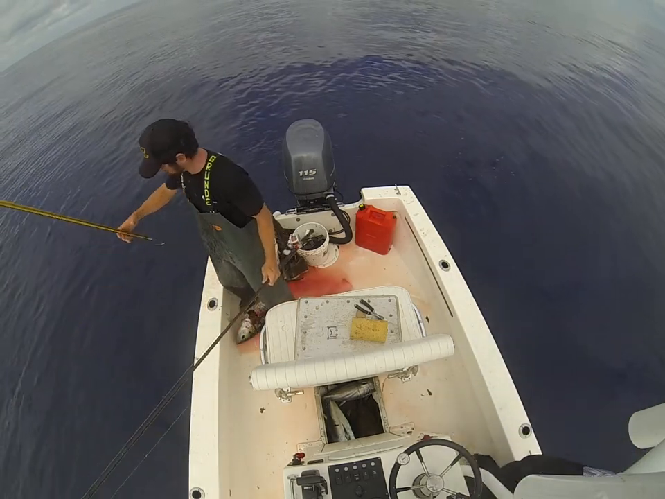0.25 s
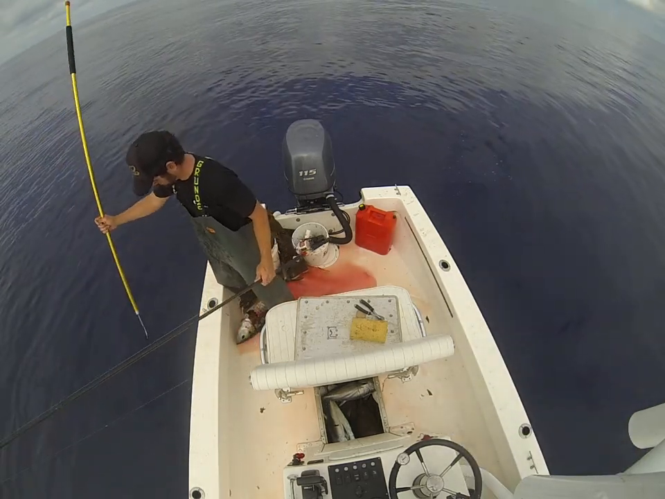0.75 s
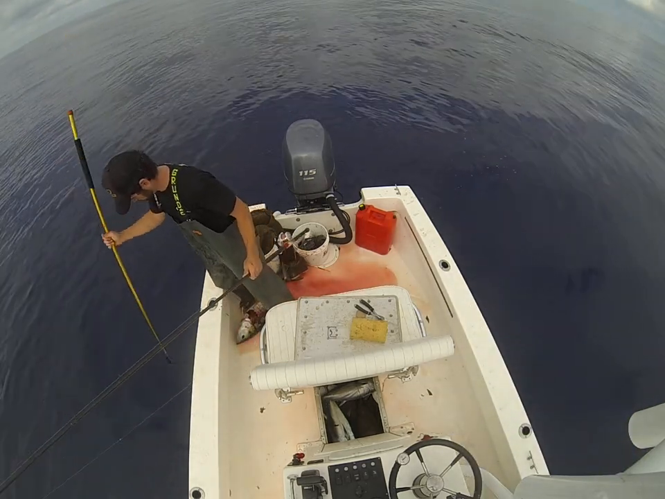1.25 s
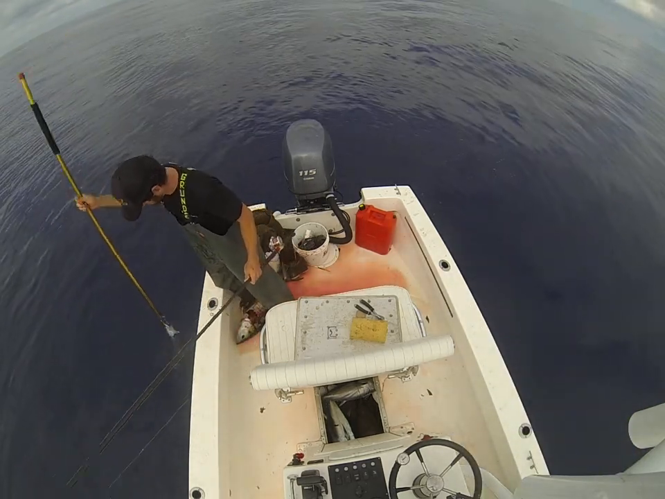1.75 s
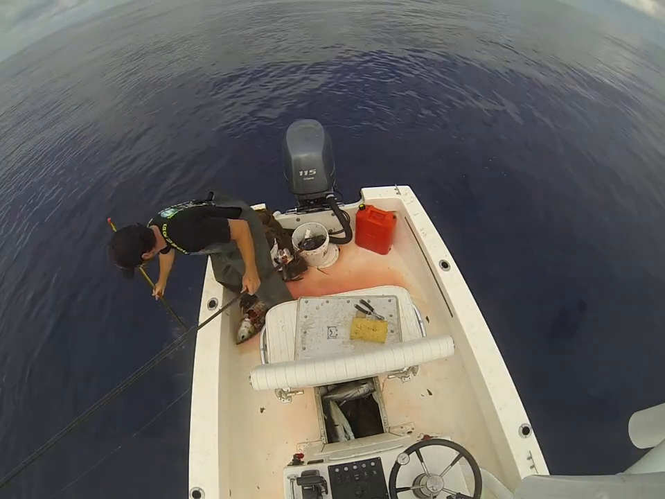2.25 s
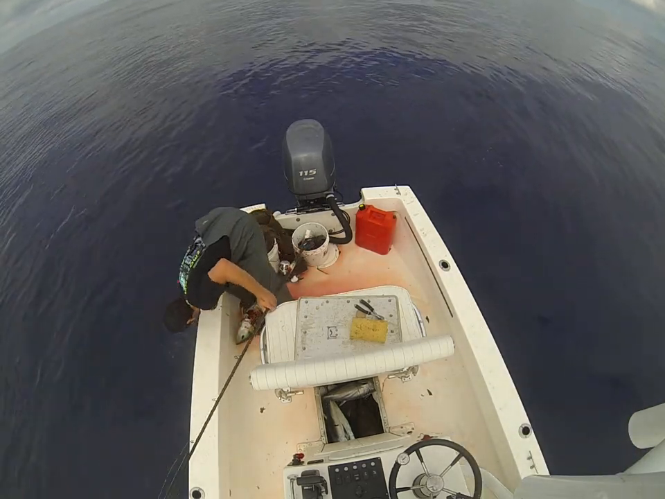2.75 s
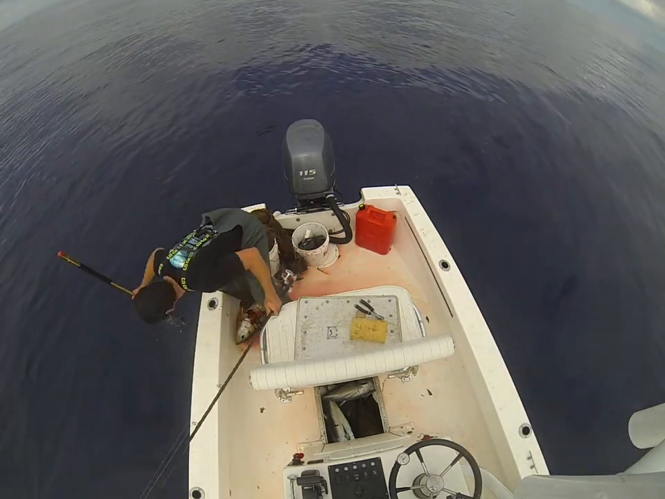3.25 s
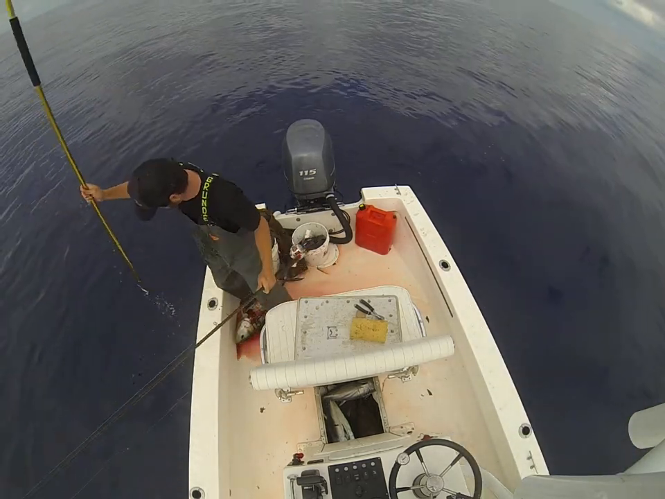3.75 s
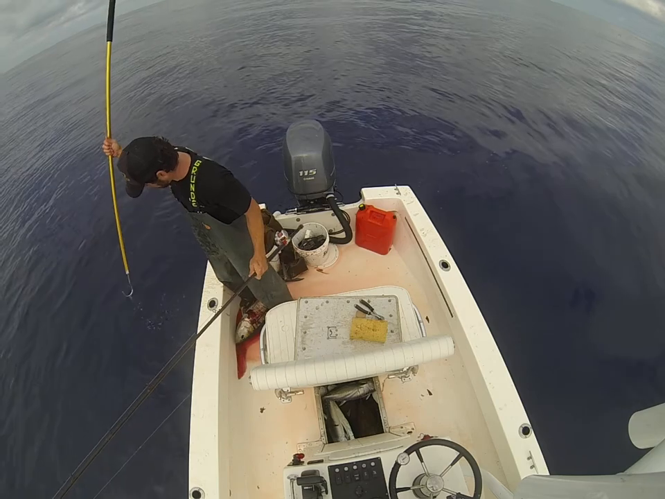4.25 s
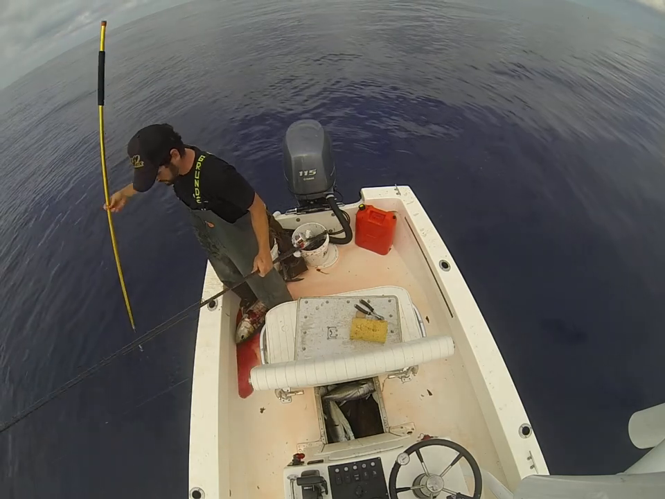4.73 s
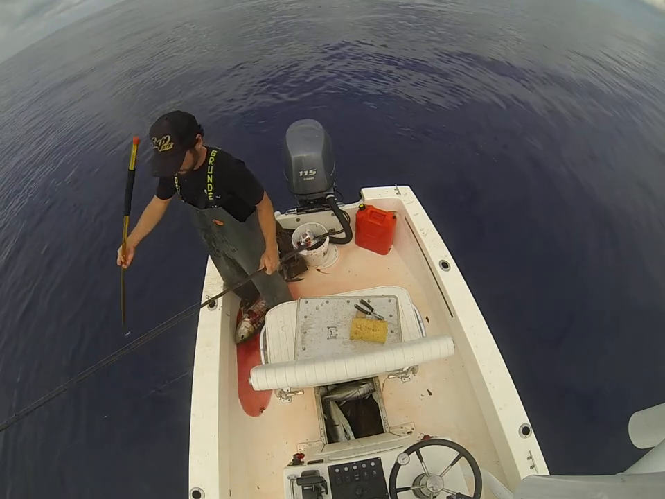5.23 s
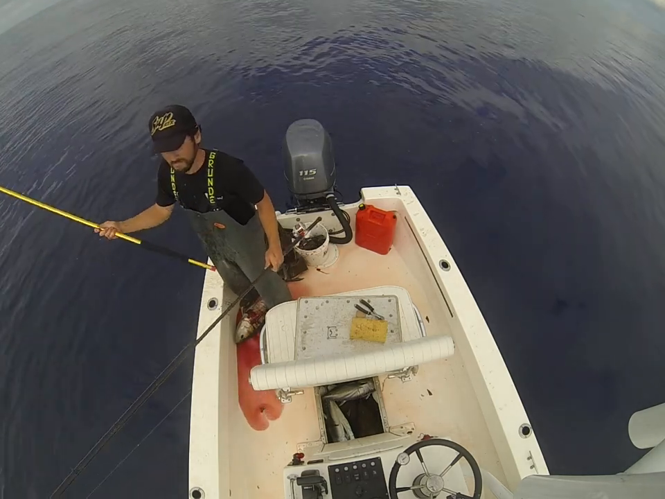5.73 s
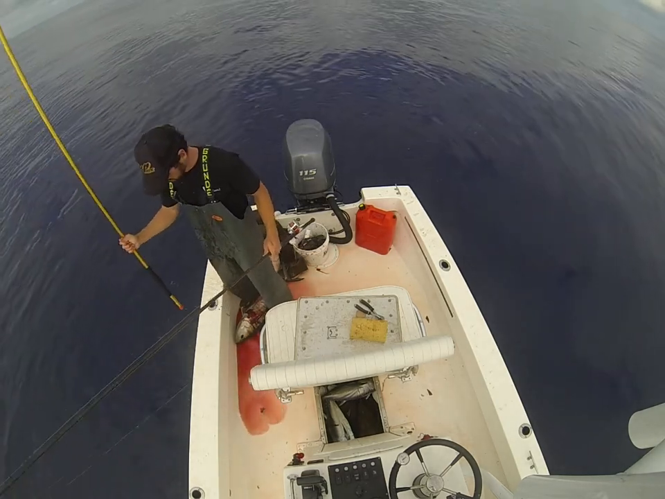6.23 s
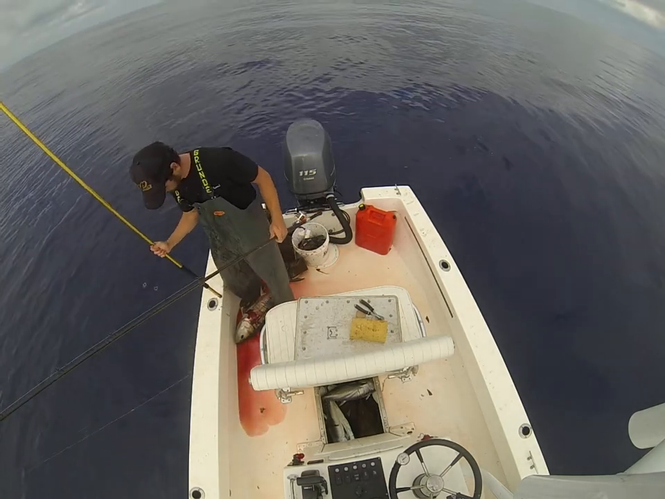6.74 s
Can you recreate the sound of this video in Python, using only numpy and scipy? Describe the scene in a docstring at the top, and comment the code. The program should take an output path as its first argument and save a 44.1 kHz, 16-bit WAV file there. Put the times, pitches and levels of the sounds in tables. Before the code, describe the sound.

A small fibreglass boat drifts at sea, heard through a cased microphone on its mast: low swaying rumble, water drumming and washing on hull panels, faint hiss and a thin pulsing high whine. From 0 to 0.6 s gear and feet give soft thuds and knocks; at 0.7 s a sharp hollow clack rings, followed by a fading tumble of taps. From 1 to 3.3 s it is quieter, with little laps, tiny ticks, a few dull bumps and faint plips. At 3.45 s a heavy step and knocks begin a clattering run on the boat's side, bright at 3.5-3.6 s, loudest at 3.93 s, thinning by 4.6 s. A boot scrapes briefly at 4.65-4.9 s, with a soft thud. At 5.56 s a hard double knock sets a metal rail singing. Light bumps follow, a clack at 6.5 s, then at 6.7 s a footfall and a gust's deep shudder.

```python
"""A small fibreglass boat drifts at sea, heard from a cased camera on its mast.
Throughout: noise drums the hull panels and washes, the mast sways, wind rumbles, electronics hiss and whine.
From the first moments gear and feet knock: noisy contacts ring decaying modes, then boom, hum and rattle on.
Small waves lap, hollow gear and fittings ring, a rail sings, gliding sines plip; blows thicken after 3.4 s.
A boot scrapes at 4.65 s; more blows follow, and a gust shakes the mast at 6.69 s."""
import sys
import numpy as np
from scipy import signal
from scipy.fft import rfft, irfft
from scipy.io import wavfile
from scipy.ndimage import uniform_filter1d

SR = 44100
rng = np.random.default_rng(int(sys.argv[2]) if len(sys.argv) > 2 else 0)


def unload_audio(sound):
    """Save the sound as a 16-bit wav file, at the path given as the first command line argument."""
    columns = np.transpose(np.atleast_2d(sound))
    # keep every value between -1 and 1, then stretch to whole-number steps
    steps = np.round(np.clip(columns, -1, 1) * 32767)
    wavfile.write(sys.argv[1], SR, steps.astype(np.int16))


N = 308259
TIME_S = np.arange(N) / SR
EDGE_HZ = 14900  # upper band limit

# Water on the hull: (time [s], big panels [dB before trim], small panels [dB], wash [dB before trim])
SEA_LEVELS = [(0.0, -45, -55, -56.5), (0.33, -37.5, -55.5, -57.5), (0.72, -32.5, -50.5, -53.5),
              (0.97, -41, -58.5, -61), (2.26, -47.5, -62, -64.5), (2.59, -40.5, -61.5, -60),
              (3.46, -57, -57, -61.5), (3.64, -37, -51.5, -46), (3.83, -41, -66, -59),
              (4.05, -53, -63, -48), (4.3, -48, -62, -61), (4.48, -50, -64, -51.5), (4.67, -41, -46.5, -59),
              (5.3, -43, -56.5, -59), (5.65, -31, -54, -50), (5.99, -52, -54, -66.5),
              (6.58, -52.5, -59, -60), (6.99, -38, -50, -54)]
# Hull panel resonances: (frequency [Hz], width [Hz], relative level [dB])
BIG_PANELS = [(119.8, 14, -1), (165.3, 20, 0), (199, 10.6, 2), (231.6, 12, -8)]
SMALL_PANELS = [(240, 12, -4), (275, 80, -7), (344.6, 14, -8.5), (393.4, 10, -2)]
# Spectrum of washing water: (frequency [Hz], relative density [dB per Hz])
WASH_SPECTRUM = [(250, -5.5), (390, 9), (445, -0.5), (520, 6), (625, 4), (730, 4), (830, -5.5), (1100, -7),
                 (1600, -11), (2100, -14.5), (2800, -30.5), (6000, -46)]

# Mast sway on its lowest mode: (time [s], level [dB])
SWAY_LEVELS = [(0.0, -47), (0.1, -23.5), (0.37, -34.5), (0.56, -13.5), (0.82, -28), (0.93, -21),
               (1.63, -34), (3.06, -31.5), (3.11, -22), (4.85, -39.5), (4.94, -20.5), (5.51, -33.5),
               (5.65, -18), (5.74, -34.5), (6.27, -25), (6.52, -48), (6.85, -21), (6.99, -26.5)]
# Spectrum of wind rumble: (frequency [Hz], relative density [dB per Hz])
WIND_SPECTRUM = [(20, -22), (36, -2.5), (48, 2), (62, -5.5), (80, -5), (100, -11), (160, -22), (300, -54.5),
                 (1500, -100)]
BREEZE_DB, GUST_DB = -40.5, -20.5
GUST_S, GUST_RISE_S, GUST_HOLD_S, GUST_FALL_DB_PER_S = 6.69, 0.03, 0.16, 101.5
# stiffer mast mode, shaken by the gust
SHUDDER_DB, SHUDDER_HZ, SHUDDER_SAG_HZ_PER_S = -13, 49.6, 30

# Spectrum of electronic hiss: (frequency [Hz], relative density [dB per Hz])
HISS_SPECTRUM = [(100, 7), (1500, 4.5), (4000, -1.5), (5500, -5.5), (7500, -5.5), (9500, -11),
                 (11000, -8.5), (14000, -19.5)]
HISS_DB = -66.5

# Light scratchy rubs of gear: (time [s], level before envelope [dB], decay [s])
SCUFFS = [(.04, -61, 0.025), (0.474, -54.5, 0.016), (1.386, -53, 0.02), (2.045, -53.5, 0.0088),
          (3.005, -48, 0.017), (4.268, -53.5, .012)]
# Spectrum of a scuff: (frequency [Hz], relative density [dB per Hz])
SCUFF_SPECTRUM = [(300, -31), (1000, -4.5), (1800, 3.5), (2500, -5), (3700, -2.5), (4600, -20), (6000, -12),
                  (12000, -40)]

# Gear knocking on the boat: (time [s], force [dB], weight: extra thud [dB], hollowness: extra bonk [dB],
# hardness: extra treble [dB], struck spot's own note [Hz])
KNOCKS = [(.057, -47, 12.5, -1, -0.5, 614), (.102, -51.5, 1, -2, -6, 1380),
          (.131, -49.5, 13.5, 1, -20, 1110), (.228, -49, 9, 11, -3, 670), (.308, -52, 23.5, 13, -4.5, 666),
          (.337, -50, 14.5, 16, -7, 650), (.487, -40, 16, -4, -20, 614), (.501, -41.5, 15.5, -19, -17, 720),
          (.556, -41, 16.5, 4, -14, 620), (.576, -43, 13, -2, -7, 616), (.6995, -29.5, 3, 13, -2, 1540),
          (.707, -35.5, -3, 7, -3, 1380), (.724, -32.5, 6, 0, -9, 526), (.753, -43, 11, 7, -9, 534),
          (.772, -50, 7, 6, -10.5, 620), (.808, -40, 9, 6, -9.5, 684), (.843, -45, 6, 10, -7, 674),
          (.865, -47.5, 10, 12, -18, 620), (.902, -49, 14.5, 5, -9, 610), (1.729, -53, 17.5, 14, -1, 1120),
          (2.381, -52, 8, -16, -8, 720), (3.01, -55.5, 9, -8, 7, 1010), (3.192, -43.5, -3, 9, -7, 660),
          (3.459, -30.5, 1, 0, -6.5, 840), (3.514, -36, 7.5, 6, 19, 1370), (3.527, -35, 4, 3, 12.5, 1380),
          (3.559, -37, 7, -7, -1, 900), (3.58, -34.5, 5.5, -1, 2.5, 1500), (3.604, -29.5, 2, 0.5, 13, 1570),
          (3.744, -52, 14.5, -2, 1, 1220), (3.817, -30.5, 3, -15, -8, 1640),
          (3.891, -50.5, 16, 4, 10, 1770), (3.932, -21.5, 0, 4.5, 5, 595), (3.98, -31, -8, 0, -5, 620),
          (4.021, -40, -10, -2.5, -4, 620), (4.104, -39.5, -2.5, -3.5, 2.5, 1220),
          (4.163, -42.5, -15, -19, -13, 720), (4.27, -35, 5, 1, -6, 1400), (4.434, -42.5, -13, 1, -18, 720),
          (4.632, -38, -11, 3, -2.5, 720), (4.851, -42.5, 15.5, 1.5, -35, 524),
          (5.272, -54.5, 8, -2, -8, 715), (5.556, -21.5, 0, -0.5, -5.5, 577),
          (5.587, -26.5, -6, 4, -5, 1510), (5.635, -39.5, 5, 5, -9, 623), (5.671, -38.5, 3, 6.5, -10, 620),
          (5.955, -50, 12.5, 1, 5.5, 570), (6.198, -54.5, 10.5, 3, -5, 1110),
          (6.508, -43, -3.5, 2, 3.5, 980), (6.716, -49.5, 21.5, -4, -7, 725), (6.785, -46, 6, 4, -15, 610),
          (6.865, -43.5, 4.5, -1, -16, 717)]
# Soft footfalls: (time [s], force plus weight [dB], deck's note there [Hz])
STEPS = [(0.263, -28.5, 112), (0.303, -31, 116), (.945, -31.5, 163), (2.342, -32.5, 116), (2.978, -29, 151),
         (3.194, -28.5, 217), (3.461, -19, 162), (4.885, -28, 149), (6.699, -21.5, 113.7)]
STEP_WEIGHT_DB, STEP_HARDNESS_DB = 37, -9.5
# Edges of the thud, bonk, clunk, clack and tick bands: (frequency [Hz])
REGISTER_EDGES_HZ = [70, 245, 440, 1300, 2500, 6000]
# Feed of a blow into each register: (gain over force [dB], share of weight [dB/dB],
# share of hollowness [dB/dB], share of hardness [dB/dB])
REGISTER_FEEDS = [(0.5, 1, 0, 0.17), (-4.5, 0.32, 0.72, -0.15), (0.15, 0.029, 0, 0.12),
                  (-6, 0.067, 0.16, 0.77), (-24.5, 0.036, 0, 0.95)]
# Modes of hull, mast and camera case: (frequency [Hz], relative level [dB], t60 [s])
BOAT_MODES = [(84.4, -3, 0.15), (117, -0.5, 0.18), (160, -1.5, 0.22), (195.5, -4, 0.25), (222, -1, 0.15),
              (287.5, -4, 0.083), (384.6, -10.5, 0.13), (509.2, -3.5, 0.13), (550, -6, 0.08),
              (617.3, 0, 0.094), (720, -5, 0.11), (905.5, -8, 0.12), (1007, -10.5, 0.08), (1223, -9, 0.095),
              (1404, -7.5, 0.052), (1524, -7.5, 0.086), (1716, 1.5, 0.055), (1792, -2.5, 0.055),
              (1970, -4.5, 0.045), (2082, -13, 0.079), (2390, -13.5, 0.03), (2806, 5.5, 0.023),
              (3155, 3.5, 0.029), (3380, 5.5, 0.017), (4420, -15, 0.027), (4840, -23, 0.048)]
# Spectrum of contact noise: (frequency [Hz], relative density [dB per Hz])
CRACK_SPECTRUM = [(60, -9.5), (150, 10.5), (300, 6.5), (440, -11.5), (560, -27), (850, -13), (1100, -7.5),
                  (1750, -9), (2050, -24), (2280, -26.5), (2700, -27), (3400, -19), (3900, -44),
                  (5200, -33), (12000, -68)]
LEVEL_WINDOW_S = .02  # opening stretch of a blow that sets its level
CLIMB_S = .0011  # time constant of the shock climbing the mast
# blows land on the boat's side in this interval; its panel rings higher than the floor's
ON_SIDE_S = (3.4, 4.4)
FLOOR_PANEL_HZ, SIDE_PANEL_HZ, PANEL_DB, PANEL_OCTAVES = 290, 365, 11.5, 0.27

# Blows on hollow gear: (time [s], relative level [dB], favoured mode [Hz])
HOLLOW_HITS = [(.066, -38, 720), (.489, -35, 615), (.501, -38, 1050), (.502, -32.5, 712), (.577, -34, 625),
               (.662, -40, 618), (.706, -14, 544), (.728, -29, 542), (3.818, -19, 1228), (3.819, -20, 722),
               (3.936, -13, 545.6), (4.273, -21.5, 1387), (4.634, -30.5, 724), (5.59, -17.5, 548),
               (5.637, -41, 627), (6.718, -34.5, 1400), (6.865, -40, 1050)]
# Modes of hollow gear: (frequency [Hz], relative level [dB], t60 [s])
HOLLOW_MODES = [(543.7, 2.5, 0.083), (608.6, 4.5, 0.12), (715, 1.5, 0.088), (1055, 0, .045),
                (1228, -2, 0.044), (1398, -1, 0.036)]

# Small waves along the hull: (time [s], length [s], relative level [dB], most drummed panel note [Hz])
LAPS = [(0.215, 0.13, -40.5, 268), (1.739, 0.25, -39, 180), (2.417, 0.2, -43, 284), (2.774, 0.13, -43, 252),
        (3.642, 0.15, -42, 222), (4.254, 0.14, -39.5, 263), (4.397, 0.28, -35, 199),
        (4.625, 0.18, -36.5, 257), (5.678, 0.1, -33.5, 197), (6.8, 0.19, -42.5, 331)]
LAP_PEAK = 0.37  # fraction of a wave's length at which it peaks

# Loose fittings handled or jolted: (time [s], relative level [dB])
TICKS = [(.476, -52), (0.499, -48), (.556, -52), (1.345, -54), (1.4, -48), (1.736, -44), (2.046, -50.5),
         (2.108, -60), (3.464, -46), (3.513, -29), (3.585, -46), (3.604, -31), (3.628, -43), (3.858, -47),
         (3.874, -46.5), (3.922, -44), (3.933, -22), (3.963, -46), (3.982, -37.5), (4.021, -36.5),
         (4.048, -49), (4.089, -46), (4.102, -38.5), (4.657, -52), (6.193, -54), (6.82, -53.5),
         (6.865, -46)]
# Modes of a fitting: (frequency [Hz], relative level [dB], t60 [s])
FITTING_MODES = [(1865, 3.5, 0.032), (3210, -6, 0.033), (3360, -6, 0.041)]

# Blows that set a metal rail singing: (time [s], relative level [dB], favoured mode [Hz])
RAIL_HITS = [(.7, -19, 2076), (.701, -20, 1665), (.725, -28, 1710), (.809, -35, 1770), (.844, -45, 2090),
             (.865, -47, 1800), (.902, -50, 1785), (3.517, -28, 1810), (3.605, -11, 1740),
             (3.82, -29.5, 1690), (3.934, -17, 1770), (5.557, -8, 1793), (5.588, -15, 1785),
             (5.589, -25, 2065), (5.671, -37, 1790), (5.696, -40, 1794), (5.954, -32, 1795),
             (6.508, -36, 1785)]
# Modes of the rail: (frequency [Hz], relative level [dB], t60 [s])
RAIL_MODES = [(1680, 1, 0.058), (1774, 3, 0.045), (2060, 0, 0.043), (3070, -20, .05), (4000, -27, 0.15)]

# Water plips and gear squeaks: (time [s], level [dB], mid pitch [Hz], length [s], rise [octaves])
PLIPS = [(1.224, -56, 2020, 0.042, 0.072), (1.239, -60.5, 3740, 0.033, 0.011),
         (2.902, -59, 932, 0.034, 0.089), (4.692, -55, 1360, 0.057, 0.16), (5.538, -53, 2080, 0.026, .03),
         (5.666, -60, 7000, 0.0058, 0.37), (6.016, -54.5, 624, 0.089, 0.05)]

# Boot scraping along the deck: (time [s], relative level [dB])
SCRAPE_LEVELS = [(4.65, -66), (4.70, -47), (4.74, -41), (4.79, -56.5), (4.838, -58), (4.866, -45),
                 (4.93, -74)]
# Resonances rung by the sole: (frequency [Hz], width [Hz], relative level [dB])
SOLE_MODES = [(530, 22, -10), (612, 19, 7), (734, 7.8, -2), (900, 27, -11)]


def amp(db):
    """Decibels to gain."""
    return 10 ** (np.asarray(db) / 20)


def unit(x):
    """Scales to rms 1."""
    return x / np.sqrt(np.mean(x ** 2) + 1e-20)


def follow(rows):
    """Columns of a curve table, interpolated at every sample."""
    times_s, *columns = np.transpose(rows)
    return [np.interp(TIME_S, times_s, column) for column in columns]


def read(points, hz):
    """Spectrum level in dB, interpolated over log frequency."""
    point_hz, db = np.transpose(points)
    return np.interp(np.log(hz + 1), np.log(point_hz), db)


def add(mix, start_s, sound):
    """Mixes a sound in at start_s."""
    part = mix[max(round(start_s * SR), 0):][:len(sound)]
    part += sound[:len(part)]


def noise(points):
    """Steady noise of rms 1 with a given spectrum."""
    gain = amp(read(points, np.fft.rfftfreq(N, 1 / SR)))
    return unit(irfft(rfft(rng.standard_normal(N)) * gain, N))


def drift(knots_per_s):
    """Random wander of rms 1, linear between knots."""
    knots = rng.standard_normal(int(knots_per_s * N / SR) + 2)
    return unit(np.interp(TIME_S * knots_per_s, np.arange(len(knots)), knots))


def steadied(x, span_s):
    """Noise with swells slower than span_s evened out."""
    power = np.abs(uniform_filter1d(x ** 2, int(span_s * SR)))
    return x / np.sqrt(power + 1e-9)


def causal(points, size=4096):
    """Minimum-phase impulse response: a sharp front with a given spectrum."""
    log_gain = np.log(amp(read(points, np.abs(np.fft.fftfreq(size, 1 / SR)))))
    spectrum = np.exp(np.conj(signal.hilbert(log_gain)))
    return np.fft.ifft(spectrum).real[:size // 2]


def decays(modes, t):
    """Each mode's amplitude as it decays exponentially."""
    _, db, t60_s = np.transpose(modes)
    return amp(db[:, None] - 60 * t / t60_s[:, None])


def favour(hz, note_hz, octaves):
    """How strongly a spot with its own note excites modes at hz, 0-1."""
    return np.exp(-(np.log2(hz / note_hz) / octaves) ** 2)


def panels(modes, even_s=0.15, skirt=0.58):
    """Noise ringing in a set of resonant panels."""
    hz = np.fft.rfftfreq(N, 1 / SR)
    response = sum(amp(db) / (1 + skirt * ((hz - mode_hz) / width_hz) ** 2) ** 2
                   for mode_hz, width_hz, db in modes)
    return steadied(irfft(rfft(rng.standard_normal(N)) * response, N), even_s)


def grains(points, per_s, t60_s, spread_db=4, count=12, size=2000):
    """Tiny contacts at random moments, each a short noise ring of one of several colours."""
    out, t = np.zeros(N), np.arange(size) / SR
    happens = rng.random(N) < per_s / SR
    sizes = amp(spread_db * np.minimum(rng.exponential(1, N), 2)) * happens
    kind = rng.integers(0, count, N)
    rings = rng.standard_normal((count, size)) * amp(-60 * t / t60_s)
    for k, ring in enumerate(rings):
        out += signal.oaconvolve(sizes * (kind == k), ring)[:N]
    return unit(signal.oaconvolve(out, causal(points))[:N])


def sea(big_trim_db=-0.5, wash_trim_db=-0.5, lap_db=2.5, slaps_per_s=45, slap_t60_s=0.04, slap_size=0.6):
    """Water drums the hull panels and washes along the sides in many little slaps."""
    big_db, small_db, wash_db = follow(SEA_LEVELS)
    drum = amp(big_db + big_trim_db) * panels(BIG_PANELS) + amp(small_db) * panels(SMALL_PANELS)
    choppy = slap_size * amp(wash_db - np.median(wash_db))  # livelier water slaps harder
    slaps = grains(WASH_SPECTRUM, slaps_per_s, slap_t60_s)
    water = (noise(WASH_SPECTRUM) + choppy * slaps) / np.hypot(1, choppy)
    return drum + amp(wash_db + wash_trim_db + lap_db * drift(40)) * water


def gust():
    """Strength of the gust, 0-1: linear rise, hold, exponential fall."""
    t = TIME_S - GUST_S
    fall_s = np.maximum(t - GUST_RISE_S - GUST_HOLD_S, 0)
    return np.clip(t / GUST_RISE_S, 0, 1) * amp(-GUST_FALL_DB_PER_S * fall_s)


def mast(db, hz, waver_db=0.3):
    """A slow mast mode shakes the microphone: a sine of wavering level."""
    phase = 2 * np.pi * (np.cumsum(hz) / SR + rng.random())
    return amp(db + waver_db * drift(23)) * np.sqrt(2) * np.sin(phase)


def shaking(sway_hz=27, wander_hz=1.1):
    """The mast sways all the time and shudders at a sinking pitch when the gust hits."""
    sway_db, = follow(SWAY_LEVELS)
    sway = mast(sway_db, sway_hz + wander_hz * drift(7.3))
    shudder_hz = SHUDDER_HZ - SHUDDER_SAG_HZ_PER_S * np.maximum(TIME_S - GUST_S, 0)
    return sway + gust() * mast(SHUDDER_DB, shudder_hz)


def wind(lumps_db=3.5):
    """Lumpy low rumble on the case: a breeze throughout, plus the gust."""
    level = amp(BREEZE_DB + lumps_db * drift(9.1)) + amp(GUST_DB) * gust()
    return level * steadied(noise(WIND_SPECTRUM), 0.085)


def electronics(whine_hz=6445, whine_db=-63, octave_db=-65.0, slip_rad=1.6, pictures_per_s=47.952):
    """Hiss, and a thin whine gated on once for every picture the camera takes; levels before gating."""
    pictures = TIME_S * pictures_per_s + .69
    gate = uniform_filter1d(1. * (pictures % 1 < .42), 16)
    restart_rad = slip_rad * rng.standard_normal(int(pictures[-1]) + 2)
    # each burst starts out of step; the phase jumps while the gate is shut
    phase = 2 * np.pi * whine_hz * TIME_S + restart_rad[(pictures + .2).astype(int)]
    whine = np.sqrt(2) * (amp(whine_db) * np.sin(phase) + amp(octave_db) * np.sin(2 * phase))
    return gate * whine + amp(HISS_DB) * noise(HISS_SPECTRUM)


def scuffs(rise_s=0.0005, grain_db=3):
    """Brief rubs: grainy bright noise, too light to ring the hull."""
    level, t = np.zeros(N), np.arange(SR // 4) / SR
    for start_s, db, decay_s in SCUFFS:
        add(level, start_s, amp(db) * (1 - np.exp(-t / rise_s)) * np.exp(-t / decay_s))
    return level * amp(grain_db * drift(600)) * noise(SCUFF_SPECTRUM)


def blows():
    """Knocks and footfalls together; a footfall is a blow that is nearly all weight."""
    footfalls = [(start_s, db - STEP_WEIGHT_DB, STEP_WEIGHT_DB, 0, STEP_HARDNESS_DB, note_hz)
                 for start_s, db, note_hz in STEPS]
    return KNOCKS + footfalls


def knock(levels_db, note_hz, fades, chatter=0.27, chatter_s=0.0066, crack_db=-10, crack_t60_s=0.049,
          tail_db=-26, tail_t60_s=0.22, spot_db=2, note_db=10, note_octaves=0.11):
    """One blow: a chattering contact rings the boat's modes, levelled register by register."""
    size, first = fades.shape[1], int(LEVEL_WINDOW_S * SR)
    t, hz = np.arange(size) / SR, np.transpose(BOAT_MODES)[0]
    # heavy blows chatter longer than light taps
    contact_s = chatter_s * 2 ** ((max(levels_db) + 26.0) / 20)
    force = chatter * rng.standard_normal(size) * (rng.random(size) < .1) * np.exp(-t / contact_s)
    force[0] = 1
    # each spot favours its own modes
    spot_gain_db = note_db * favour(hz, note_hz, note_octaves) + spot_db * rng.standard_normal(len(hz))
    gains = amp(spot_gain_db) * rng.choice([-1, 1], len(hz))
    pitch_hz = hz * (1 + 0.0082 * rng.standard_normal(len(hz)))
    rings = gains[:, None] * fades * np.sin(2 * np.pi * pitch_hz[:, None] * t)
    # countless weak modes blur into a crack and a faint tail
    blur_fade = amp(-60 * t / crack_t60_s) + amp(tail_db - 60 * t / tail_t60_s)
    blur = signal.fftconvolve(rng.standard_normal(size) * blur_fade, causal(CRACK_SPECTRUM))[:size]
    climb = (1 - np.exp(-t / CLIMB_S)) ** 2
    out = np.zeros(size)
    for lo_hz, hi_hz, level_db in zip(REGISTER_EDGES_HZ, REGISTER_EDGES_HZ[1:], levels_db):
        # the top register's filter stays open to the band limit
        top_hz = hi_hz if hi_hz < REGISTER_EDGES_HZ[-1] else EDGE_HZ
        band = signal.butter(3, [lo_hz, top_hz], "band", fs=SR, output="sos")
        in_band = (hz >= lo_hz) & (hz < hi_hz)
        ring = signal.fftconvolve(rings[in_band].sum(0), force)[:size]
        ring, crack = signal.sosfilt(band, np.array([ring, blur]) * climb)
        part = ring / ring[:first].std() + amp(crack_db) * crack / crack[:first].std()
        out += amp(level_db) * part / part[:first].std()
    return out


def deck(size=12000):
    """Feet and gear strike the boat: weight feeds the low registers, hardness mostly the high ones."""
    out, fades = np.zeros(N), decays(BOAT_MODES, np.arange(size) / SR)
    hz, feeds = np.transpose(BOAT_MODES)[0], np.array(REGISTER_FEEDS)
    for start_s, force_db, weight_db, hollow_db, hardness_db, note_hz in blows():
        panel_hz = SIDE_PANEL_HZ if ON_SIDE_S[0] < start_s < ON_SIDE_S[1] else FLOOR_PANEL_HZ
        panel = amp(PANEL_DB * favour(hz, panel_hz, PANEL_OCTAVES))
        levels_db = force_db + feeds @ [1, weight_db, hollow_db, hardness_db]
        add(out, start_s, knock(levels_db, note_hz, panel[:, None] * fades))
    return out


def stirred(weight_share, t60_s, rise_s=0.0081):
    """Motion the blows leave in the boat: each adds its energy, which then dies away."""
    energy, t = np.zeros(N), np.arange(SR) / SR
    shape = (1 - np.exp(-t / rise_s)) * amp(-60 * t / t60_s)
    for start_s, force_db, weight_db, *_ in blows():
        add(energy, start_s, (amp(force_db + weight_share * weight_db) * shape) ** 2)
    return np.sqrt(energy)


def aftershock(boom_db=-6, boom_t60_s=0.43, hum_db=-10, hum_t60_s=0.43,
               clatter_db=-25, clatter_t60_s=0.72, rattles_per_s=160, rattle_t60_s=.022):
    """After a blow the mast booms, the hull panels hum and loose gear rattles on."""
    boom = amp(boom_db) * stirred(0.98, boom_t60_s) * steadied(noise(WIND_SPECTRUM), 0.14)
    hum = amp(hum_db) * stirred(0.87, hum_t60_s) * panels(BIG_PANELS)
    rattles = grains(CRACK_SPECTRUM, rattles_per_s, rattle_t60_s)
    clatter = amp(clatter_db) * stirred(0.33, clatter_t60_s) * rattles
    return boom + hum + clatter


def struck(hits, modes, others_db, octaves=0.04, rise_s=0.0018, size=12000):
    """Clear modal ringing: the struck spot favours one mode, the others sound more weakly."""
    out, t, hz = np.zeros(N), np.arange(size) / SR, np.transpose(modes)[0]
    rings = decays(modes, t) * np.sin(2 * np.pi * hz[:, None] * t) * (1 - np.exp(-t / rise_s))
    for start_s, db, note_hz in hits:
        gains = amp(db + others_db * (1 - favour(hz, note_hz, octaves)))
        add(out, start_s, gains @ rings)
    return out


def hollow_gear():
    """Hollow gear rings a few mid-pitched, quickly dying modes when struck."""
    return struck(HOLLOW_HITS, HOLLOW_MODES, others_db=-24.0)


def laps(note_db=18, note_octaves=0.26):
    """Each small wave swells against one part of the hull and draws back."""
    out = np.zeros(N)
    for start_s, length_s, db, note_hz in LAPS:
        knots_s = [start_s, start_s + LAP_PEAK * length_s, start_s + length_s]
        swell = np.sqrt(np.interp(TIME_S, knots_s, [0, 1, 0]))
        modes = [(hz, width_hz, level_db + note_db * favour(hz, note_hz, note_octaves))
                 for hz, width_hz, level_db in BIG_PANELS + SMALL_PANELS]
        out += amp(db) * swell * panels(modes)
    return out


def ticks(scatter=0.02, chatter_s=0.0019, size=3000):
    """A fitting's contact chatters briefly and rings its bright modes, each time slightly detuned."""
    out, t, hz = np.zeros(N), np.arange(size) / SR, np.transpose(FITTING_MODES)[0]
    fades = decays(FITTING_MODES, t)
    for start_s, db in TICKS:
        pitches_hz = hz * (1 + scatter * rng.standard_normal(len(hz)))
        contact = rng.standard_normal(size) * t * np.exp(-t / chatter_s)
        for fade, pitch_hz in zip(fades, pitches_hz):
            ring = signal.fftconvolve(fade * np.sin(2 * np.pi * pitch_hz * t), contact)[:size]
            add(out, start_s, amp(db) * fade.std() * unit(ring) / 2)
    return out


def rail():
    """A metal rail sings in its own modes when a blow reaches it."""
    return struck(RAIL_HITS, RAIL_MODES, others_db=-19)


def plips(rough_rad=0.7):
    """Water plips and gear squeaks: short gliding sines, roughened by phase wander."""
    out = np.zeros(N)
    for start_s, db, hz, length_s, rise_octaves in PLIPS:
        u = np.arange(0, 1, 1 / (length_s * SR))  # progress, 0-1
        glide_hz = hz * 2 ** (rise_octaves * (u - .5))
        phase = 2 * np.pi * np.cumsum(glide_hz) / SR + rough_rad * drift(630)[:len(u)]
        swell = np.sin(np.pi * u ** 0.57) ** 2
        add(out, start_s, amp(db) * unit(swell * np.sin(phase)))
    return out


def scrape(grip_db=3, rub_db=-4):
    """A sole rubs with a broad noise of unsteady grip, and the deck hums under it."""
    db, = follow(SCRAPE_LEVELS)
    sliding = (TIME_S > SCRAPE_LEVELS[0][0]) & (TIME_S < SCRAPE_LEVELS[-1][0])
    friction = unit(panels(SOLE_MODES, even_s=0.16) + amp(rub_db) * noise(WASH_SPECTRUM))
    return sliding * amp(db + grip_db * drift(70)) * friction


def scene():
    """Everything that reaches the one microphone."""
    steady = sea() + shaking() + wind() + electronics()
    gear = scuffs() + deck() + aftershock() + hollow_gear() + ticks() + rail() + scrape()
    return (steady + gear + laps() + plips())[None]


def record(dry):
    """Low-pass at the upper band limit."""
    lowpass = signal.firwin(511, EDGE_HZ, window=("kaiser", 9), fs=SR)
    return signal.oaconvolve(dry, lowpass[None], "same")


dry = scene()
out = record(dry)
unload_audio(out)
```